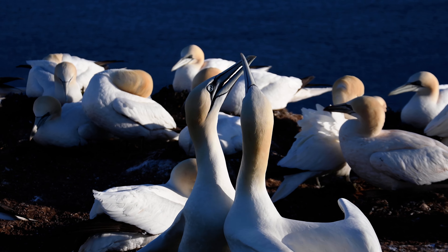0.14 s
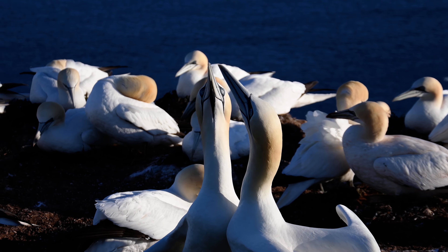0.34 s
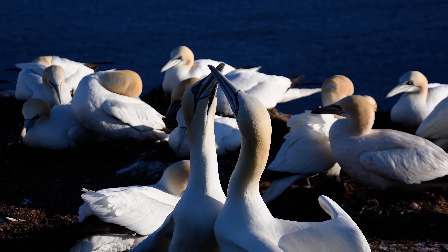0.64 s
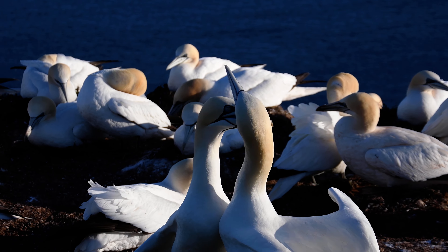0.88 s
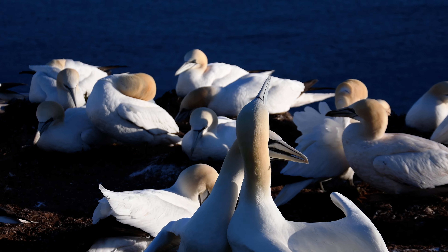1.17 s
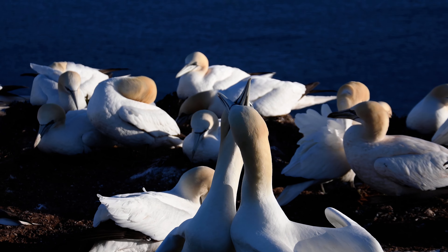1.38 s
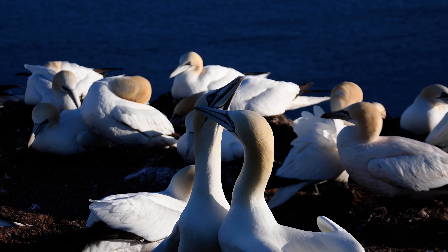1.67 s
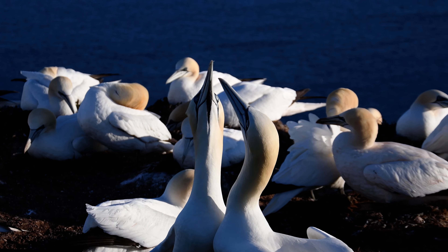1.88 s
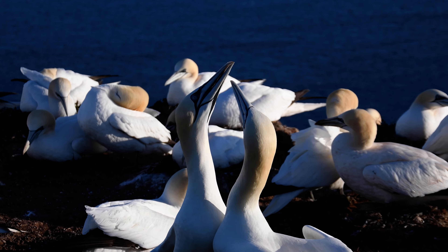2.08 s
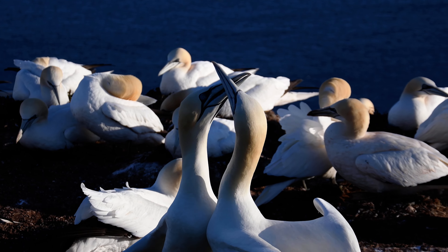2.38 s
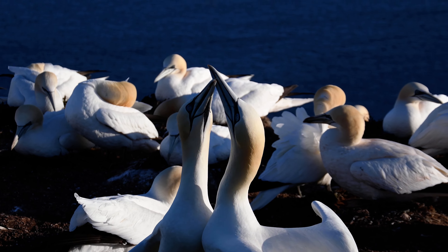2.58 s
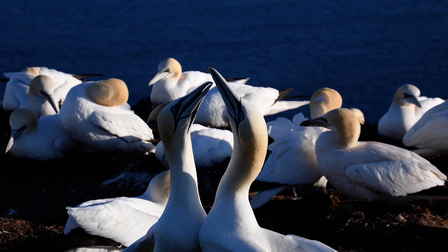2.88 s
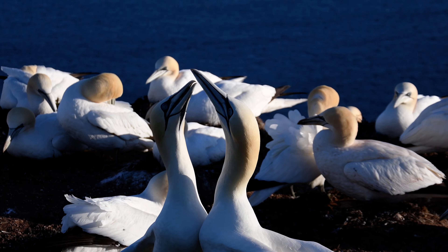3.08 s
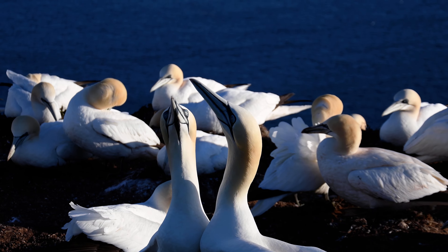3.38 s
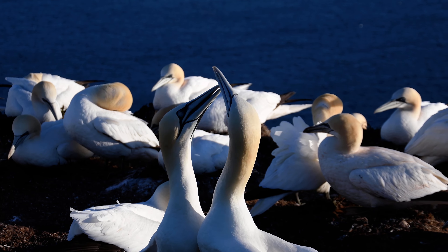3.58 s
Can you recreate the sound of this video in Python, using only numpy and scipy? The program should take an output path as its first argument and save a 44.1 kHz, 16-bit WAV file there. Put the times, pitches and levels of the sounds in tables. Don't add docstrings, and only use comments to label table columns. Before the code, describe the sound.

Gannets call in rough, stuttering bursts: loud croaks ahead at 0.2-0.7 seconds and again near 2.2, raspier cackles between 0.4 and 2.7, thinning afterwards. Higher, steadier honks from the side sound around 1.4-1.6, then repeatedly at 2.75-3.6. Wind roars and crackles on the left, easing near 1.4-1.7 and 3.3, with dull right-side thumps. Faint bill ticks, slight rock echoes and steady distant colony and sea noise.

```python
import sys
import numpy as np
from scipy import signal
from scipy.fft import rfft, irfft
from scipy.io import wavfile
from scipy.ndimage import uniform_filter1d, minimum_filter1d

SR = 44100
rng = np.random.default_rng(int(sys.argv[2]) if len(sys.argv) > 2 else 0)


def gain_from_db(level_db):
    decades = np.asarray(level_db, float) / 20
    return 10 ** decades


def transcribe(signal):
    frames = np.atleast_2d(signal).T
    limited = np.clip(frames, -1, 1)
    pcm = np.round(limited * 32767).astype(np.int16)
    wavfile.write(sys.argv[1], SR, pcm)


N = 164934

# centre_hz, width_hz, level_db
THROAT_FROM_SIDE = [(710, 980, -16), (1426, 464, -3), (1900, 342, -1.5), (2482, 486, -12.5)]
# freq_hz, level_db, lead_rad
PORTS_FROM_SIDE = [(800, 0, .2), (1850, -5, 1.4), (2600, 1, 2.6), (3300, 15, 1.6), (4700, -1, 2.6),
                   (6500, 3, 3.8), (10000, 6, 5.8)]
# time_s, level_db
LEFT_GUST = [(0.0, -2.5), (0.94, -9), (1.081, -2.5), (1.27, -7.5), (1.42, -19), (1.662, -15), (1.711, -10),
             (1.78, -7.5), (2.13, -12), (2.272, -3), (2.34, -6.5), (2.49, -2), (2.73, -2.5), (2.989, -5.5),
             (3.22, -15), (3.38, -17), (3.56, -7), (3.73, -9)]


def rms_one(x):
    return x / np.sqrt(np.mean(x ** 2) + 1e-20)


def at_hz(points, hz, axis=1):
    table = np.array(points)
    return np.interp(np.log(hz + 1), np.log(table[:, 0]), table[:, axis])


def drift(rate_hz):
    r = np.exp(-20 * np.pi * rate_hz / SR)
    slow = signal.lfilter([1], [1, -2 * r, r * r], rng.standard_normal(N // 10 + 2002))
    slow = rms_one(slow[2000:])
    return np.interp(np.arange(N) / 10, np.arange(len(slow)), slow)


def band_noise(low_hz, high_hz):
    band = signal.butter(2, [low_hz, high_hz], "band", fs=SR, output="sos")
    return signal.sosfilt(band, rng.standard_normal(N))


def resonance(x, hz, width_hz):
    r = np.exp(-np.pi * width_hz / SR)
    b = (1 - r * r) / 2 * np.array([1, 0, -1])
    a = [1, -2 * r * np.cos(2 * np.pi * hz / SR), r * r]
    return signal.lfilter(b, a, signal.lfilter(b, a, x))


def burst_controls(bursts):
    edge_db, edge_shape, cut_db_per_s = 10, 1.8, 9000
    t = np.arange(N) / SR
    rate, rough, level = np.full(N, 400.), np.full(N, .5), np.zeros(N)
    for start, length, crest, db, hz, grit, glide in bursts:
        near = slice(max(int((start - .01) * SR), 0), int((start + length + .01) * SR))
        u = (t[near] - start) / length
        away = np.where(u < crest, (crest - u) / crest, (u - crest) / (1 - crest))
        swell_db = db - edge_db * np.minimum(away, 1) ** edge_shape
        outside = np.maximum(np.maximum(-u, u - 1), 0)
        level[near] += gain_from_db(swell_db - cut_db_per_s * length * outside)
        rate[near] = hz * (1 + glide * (u - .5))
        rough[near] = grit
    return rate, rough, level


def throat_source(rate, rough, jitter, size_db, breath):
    turns = np.cumsum(rate * np.exp(jitter * rough * drift(120)) / SR)
    at = np.flatnonzero(np.diff(np.floor(turns))) + 1
    late = (turns[at] % 1) / (turns[at] - turns[at - 1])
    spread_db = size_db * rough[at]
    size = gain_from_db(spread_db * rng.standard_normal(N)[at] - .1 * spread_db ** 2) * np.sqrt(SR / rate[at])
    pulses = np.zeros(N)
    pulses[at], pulses[at - 1] = size * (1 - late), size * late
    gate = signal.lfilter([.02], [1, -.98], np.abs(pulses)) * 8
    hiss = np.diff(rng.standard_normal(N + 1))
    return pulses + breath * (rough + .2) * gate * hiss


def bird(bursts, throat, ports, jitter, size_db, breath):
    # centre_hz, width_hz, level_db
    upper_throat = [(3214, 810, -27.5), (4297, 720, -19), (5240, 1250, -19.5), (6540, 1670, -36.5),
                    (8260, 1000, -40.5), (11160, 2700, -59)]
    # delay_s, level_db
    rock_echoes = [(.0043, -23.5), (0.01, -37), (.019, -26)]
    rate, rough, level = burst_controls(bursts)
    source = level * throat_source(rate, rough, jitter, size_db, breath) + 1e-18
    whole = np.zeros(N)
    for k, (hz, width_hz, db) in enumerate(throat + upper_throat):
        whole += (-1) ** k * gain_from_db(db + 2 * drift(35)) * resonance(source, hz, width_hz)
    direct = rms_one(whole) * np.sqrt(np.mean(level ** 2))
    voice = direct.copy()
    for delay_s, db in rock_echoes:
        shift = int(delay_s * SR)
        voice[shift:] += gain_from_db(db) * direct[:-shift]
    hz = np.arange(N // 2 + 1) * SR / N
    to_left = gain_from_db(at_hz(ports, hz)) * np.exp(1j * at_hz(ports, hz, axis=2))
    return np.array([irfft(rfft(voice) * to_left, N), voice])


def slowed(hz, db):
    return hz * np.exp(.025 * (db + 10))


def croaks():
    # start_s, length_s, crest_share, level_db
    croak_bursts = [(0.0, 0.027, 0.47, -20.5), (0.164, 0.0096, 0.3, -28.5), (0.185, 0.037, 0.38, -18),
                    (0.245, 0.016, 0.66, -6), (0.287, 0.014, 0.45, -4), (0.298, 0.036, 0.26, -19),
                    (0.535, 0.0062, 0.79, -26), (0.548, 0.041, 0.71, -18.5), (0.611, 0.015, 0.69, -10),
                    (0.643, 0.012, 0.27, -6.5), (0.658, 0.028, 0.14, -16), (0.698, 0.014, 0.4, -26),
                    (2.137, 0.0087, 0.68, -26), (2.149, 0.044, 0.72, -14.5), (2.211, 0.015, 0.42, -8.5),
                    (2.229, 0.072, 0.18, -19.5)]
    # centre_hz, width_hz, level_db
    croak_throat = [(800, 400, -13), (1150, 350, -8), (1650, 300, 0), (2200, 520, -2)]
    # freq_hz, level_db, lead_rad
    croak_ports = [(800, 0, 0), (1850, -4, 0), (2600, -2, .3), (3400, 11, .1), (4700, -1.5, -.4),
                   (6500, -2, .2)]
    rough = .6
    bursts = [(s, n, crest, db, slowed(340, db), rough, 0) for s, n, crest, db in croak_bursts]
    return bird(bursts, croak_throat, croak_ports, jitter=.35, size_db=5.0, breath=1.5)


def cackles():
    # start_s, length_s, level_db
    cackle_bursts = [(0.358, .008, -35.5), (0.375, 0.013, -30), (0.386, 0.032, -32.5), (0.433, 0.029, -28.5),
                     (0.465, 0.012, -27), (0.492, 0.032, -30), (0.729, 0.016, -18), (0.749, 0.043, -27.5),
                     (0.895, 0.06, -28.5), (0.959, 0.019, -10.5), (0.996, 0.03, -17.5), (1.026, .038, -24),
                     (1.18, .009, -32), (1.192, 0.043, -25), (1.244, 0.02, -20), (1.286, 0.019, -23.5),
                     (1.308, 0.027, -28.5), (1.68, 0.0071, -36.5), (1.701, 0.035, -29.0), (1.723, 0.037, -27),
                     (1.759, 0.032, -15),
                     (1.803, 0.027, -17), (1.835, 0.038, -22), (1.886, 0.028, -23.5), (1.909, 0.014, -29),
             (1.976, 0.025, -27), (1.999, 0.02, -26.5), (2.038, 0.026, -15), (2.08, 0.024, -23.9),
             (2.104, 0.03, -29), (2.314, 0.018, -15.5), (2.357, 0.013, -20), (2.39, 0.025, -25),
             (2.55, 0.082, -26.5), (2.604, 0.026, -19.5), (2.642, 0.041, -17.5), (3.348, .012, -28),
             (3.361, 0.017, -23.5), (3.378, .016, -28.5), (3.684, 0.014, -28.5)]
    crest, rough = .23, .7
    bursts = [(s, n, crest, db, slowed(360, db), rough, 0) for s, n, db in cackle_bursts]
    voice = bird(bursts, THROAT_FROM_SIDE, PORTS_FROM_SIDE, jitter=.45, size_db=4.5, breath=1.7)
    return gain_from_db(.5) * voice


def honks():
    # start_s, length_s, level_db, roughness_0_to_1
    honk_bursts = [(1.413, 0.017, -31.5, 0.93), (1.427, 0.055, -15, 0.21), (1.484, .034, -16.5, 0.73),
                   (1.52, 0.031, -15.5, .3), (1.553, 0.028, -24.5, 0.83), (1.582, 0.01, -30.5, .9),
                   (1.6, .012, -39.5, .9), (2.739, 0.016, -40, .9), (2.753, 0.048, -17, 0.21),
                   (2.806, .025, -23.5, 0.91), (2.833, 0.033, -13.5, 0.72), (2.866, 0.038, -11, .7),
                   (2.903, 0.047, -12.5, 0.66), (2.948, 0.024, -23.5, 0.63), (3.075, 0.011, -30.5, 0.89),
                   (3.09, 0.054, -14.5, .22), (3.139, .034, -9, .85), (3.179, .05, -15, .75),
                   (3.233, .03, -19, .8), (3.265, 0.034, -21, .4), (3.409, .013, -19, 0.95),
                   (3.428, 0.052, -14, .22), (3.486, 0.03, -16.5, .75), (3.527, 0.046, -18, .4),
                   (3.588, 0.031, -33.5, 0.6)]
    # time_s, pitch_hz
    honk_pitch = [(1.42, 593.2), (1.47, 634), (1.525, 634.9), (1.56, 592.9), (2.75, 596.2), (2.79, 647.3),
                  (2.84, 615.8), (2.88, 659.4), (2.95, 613.2), (3.09, 602.9), (3.14, 665.5), (3.2, 657.4),
                  (3.3, 590.8), (3.43, 608), (3.47, 654), (3.53, 633), (3.6, 585)]
    bursts = []
    for s, n, db, grit in honk_bursts:
        first_hz, last_hz = np.interp([s, s + n], *np.transpose(honk_pitch))
        middle_hz = (first_hz + last_hz) / 2
        bursts.append((s, n, .45, db, middle_hz, grit, (last_hz - first_hz) / middle_hz))
    return bird(bursts, THROAT_FROM_SIDE, PORTS_FROM_SIDE, jitter=.1, size_db=6.0, breath=1.3)


def bill_clacks():
    # time_s, level_db
    clack_hits = [
        (1.569, -41.5),
        (1.687, -37.5),
        (1.915, -30.5),
        (3.519, -35.5),
        (3.689, -31.5),
    ]
    t = np.arange(N) / SR
    envelope = sum(gain_from_db(db) * (t > s - .002) * np.exp(-np.abs(t - s) / .003) for s, db in clack_hits)
    return band_noise(5000, 10000) * envelope


def bands(spectrum, swing_db, bright, patchy_db):
    edges = 20 * 2 ** np.arange(0, 9.8, .5)
    white = rng.standard_normal((2, N))
    out = np.zeros(N)
    for k, (low, high) in enumerate(zip(edges, edges[1:])):
        hz = np.sqrt(low * high)
        follow = 1 + bright * np.log2(np.clip(hz, 100, 2500) / 200)
        gain = gain_from_db(at_hz(spectrum, hz) + follow * swing_db + patchy_db * drift(18))
        band = signal.butter(2, [low, high], "band", fs=SR, output="sos")
        out += gain * signal.sosfilt(band, white[k % 2])
    return out


def wind(gust, spectrum, bright, lull_db=0):
    s, db = np.transpose(gust)
    lumps_db = 2.5 * (.5 * drift(45) + drift(75))
    swing_db = np.interp(np.arange(N) / SR, s, db - db.mean()) + lull_db + lumps_db
    dull = signal.butter(3, 1560, fs=SR, output="sos")
    rush = signal.sosfilt(dull, bands(spectrum, swing_db, bright, patchy_db=1.5))
    power = np.trapezoid(gain_from_db(2 * at_hz(spectrum, np.arange(9000.)))) * 2 / SR
    return gain_from_db(db.mean()) * rush / np.sqrt(power)


def lulls():
    # time_s, half_length_s, level_db
    lee_moments = [(0.068, 0.013, -6.5), (1.165, 0.011, -2.5), (1.411, 0.017, -7.5), (1.667, .016, -10.5),
                   (2.353, 0.0081, -1.5), (2.636, 0.016, -8), (2.722, 0.054, -6), (3.057, 0.029, -4),
                   (3.331, 0.014, 0.5)]
    t = np.arange(N) / SR
    return sum(db * np.exp(-((t - s) / half) ** 2) for s, half, db in lee_moments)


def thumps():
    # time_s, level_db
    eddy_hits = [(0.01, -4), (0.044, -26.5), (0.601, -6), (1.071, -16.5), (1.867, -22.5), (2.005, -13),
                 (2.286, -8.5), (2.522, -25), (2.891, -5), (2.997, -16), (3.03, -18), (3.084, -17.5)]
    t, half_s = np.arange(N) / SR, .007
    envelope = sum(gain_from_db(db) * np.exp(-((t - s) / half_s) ** 2) for s, db in eddy_hits)
    return rms_one(band_noise(90, 500)) * envelope


def gusts():
    # freq_hz, level_db_per_hz
    left_colour = [(25, -40.5), (60, -2), (150, 3), (400, -0.5), (800, -9.5), (1500, -25.5), (3000, -35)]
    # freq_hz, level_db_per_hz
    right_colour = [(25, -11), (50, -2), (100, 0), (200, -6), (400, -21), (1200, -45)]
    # time_s, level_db
    right_gust = [(0.0, -13.4), (0.49, -25.9), (0.61, -15.2), (0.99, -26.2), (1.09, -15.5), (1.42, -40.7),
                  (1.67, -37.7), (1.87, -15.7), (1.96, -25.1), (2.02, -15.6), (2.21, -33.1), (2.29, -12.3),
                  (2.36, -25.6), (3.08, -16.9), (3.16, -31.6), (3.35, -39.4), (3.43, -30.8), (3.73, -28.5)]
    left = wind(LEFT_GUST, left_colour, bright=.51, lull_db=lulls())
    right = wind(right_gust, right_colour, bright=.2) + thumps()
    return np.array([left + gain_from_db(-14) * right, right + gain_from_db(-34) * left])


def snaps():
    # time_s, level_db
    membrane_snaps = [(0.031, -33), (0.1, -30.5), (0.1193, -33.5), (0.1484, -25), (0.3946, -35),
                      (0.4396, -38.5), (0.481, -31), (0.694, -29.5), (0.732, -32), (0.9365, -32),
                      (0.9632, -26.5), (1.0073, -27), (1.0157, -25), (1.022, -34), (1.0491, -35),
                      (1.0676, -37.5), (1.081, -30), (1.0878, -32), (1.1016, -32.5), (1.1124, -28),
                      (1.1782, -42), (1.2048, -28.5), (1.2682, -36), (1.2872, -45), (1.465, -34),
                      (1.6875, -57.5), (1.8126, -30.5), (1.836, -31), (1.8565, -28), (2.0482, -23.5),
                      (2.0872, -32), (2.2486, -39.5), (2.256, -42), (2.2681, -32), (2.303, -38),
                      (2.3175, -43), (2.3888, -36.5), (2.4263, -28), (2.435, -37), (2.4934, -28.5),
                      (2.5126, -30), (2.5465, -29.5), (2.568, -27), (2.615, -22.5), (2.7705, -31.5),
                      (2.8153, -32.5), (2.8398, -41), (2.888, -29), (2.894, -30), (2.918, -27),
                      (2.9519, -26), (2.963, -32), (3.1304, -34), (3.1926, -32.5), (3.469, -32.5),
                      (3.55, -31)]
    flutter_per_s, flutter_db, snap_s = 240, -20, .00097
    s, db = np.transpose(membrane_snaps)
    gust = gain_from_db(np.interp(np.arange(N) / SR, *np.transpose(LEFT_GUST)) + 2 * lulls())
    flutter = rng.random(N) < flutter_per_s / SR
    kicks = flutter * gust * gain_from_db(flutter_db - 4.5 * rng.exponential(1, N))
    kicks[(s * SR).astype(int)] = gain_from_db(db + 25)
    burst = np.convolve(kicks, np.hanning(int(2 * snap_s * SR) + 3), "same")
    burst = burst * rng.choice([-1, 1], N)
    return signal.sosfilt(signal.butter(2, [1200, 2870], "band", fs=SR, output="sos"), burst)


def far_colony():
    # freq_hz, level_db_per_hz
    far_colour = [(600, 12), (1800, -8), (2500, 1.5), (3300, -11), (5000, 2), (7500, -15.5), (14000, -26.5)]
    sides = [rms_one(bands(far_colour, np.zeros(N), 0, .51)) for side in range(2)]
    return gain_from_db(-49) * np.array(sides)


def scene():
    birds = croaks() + cackles() + honks() + bill_clacks()
    return birds + gusts() + far_colony()


def housing(x):
    # freq_hz, sharpness
    housing_dips = [(7700, 12), (9650, 16)]
    for hz, sharp in housing_dips:
        x = .15 * x + .85 * signal.lfilter(*signal.iirnotch(hz, sharp, SR), x)
    return x


def limiter(x):
    release_db_per_s, overshoot_db = 602.5, 1.37
    fall = release_db_per_s * np.arange(N) / SR
    over_db = 20 * np.log10(np.maximum(np.abs(x), 1))
    held_db = np.maximum.accumulate(over_db + fall, axis=1) - fall
    widened_db = -minimum_filter1d(-held_db, size=21, axis=1)
    return x * gain_from_db(overshoot_db - uniform_filter1d(widened_db, size=31, axis=1))


def band_limit(x):
    return signal.sosfilt(signal.butter(12, 15800, fs=SR, output="sos"), x)


def record(dry):
    x = limiter(housing(dry))
    x = x + snaps() * [[1], [0]]
    return band_limit(np.clip(x, -1, 1))


dry = scene()
out = record(dry)
transcribe(out)
```